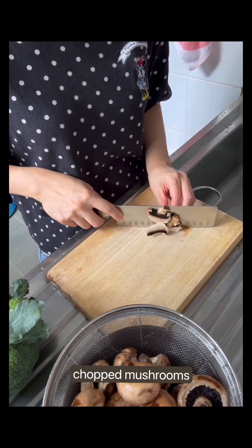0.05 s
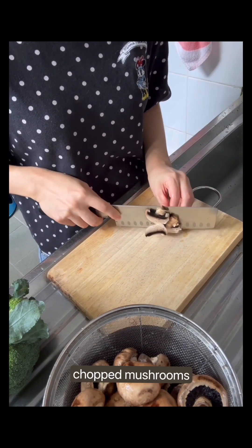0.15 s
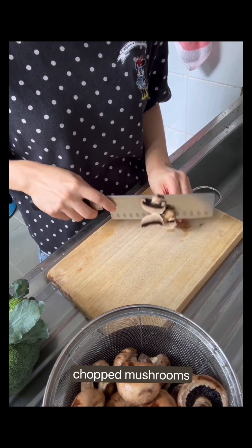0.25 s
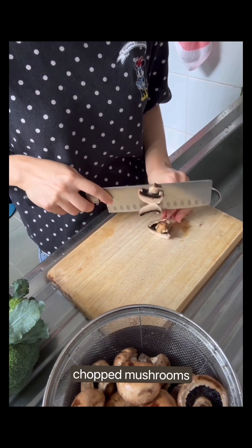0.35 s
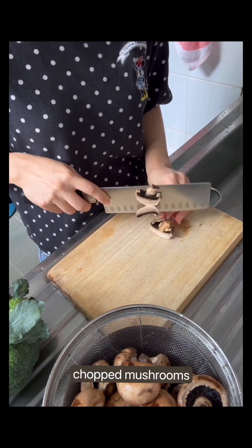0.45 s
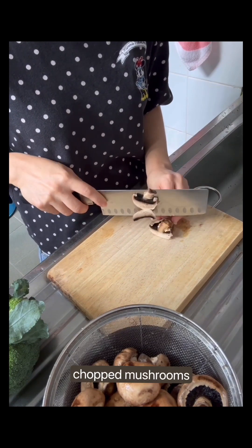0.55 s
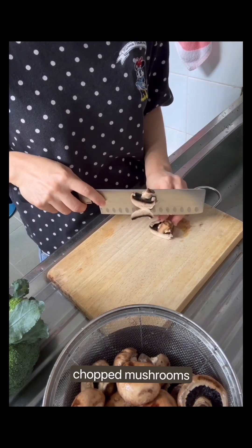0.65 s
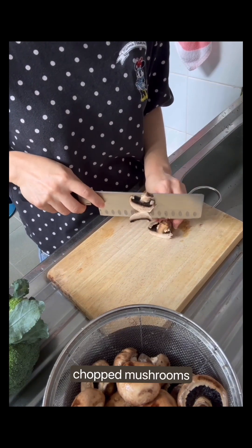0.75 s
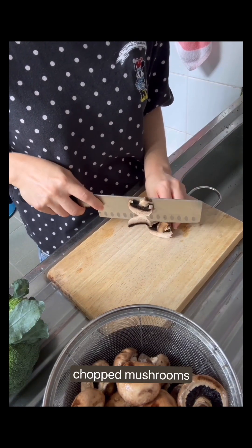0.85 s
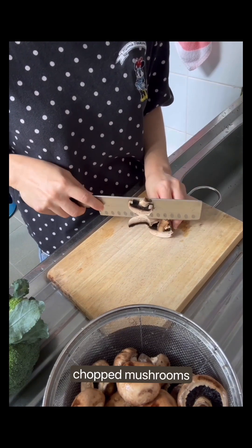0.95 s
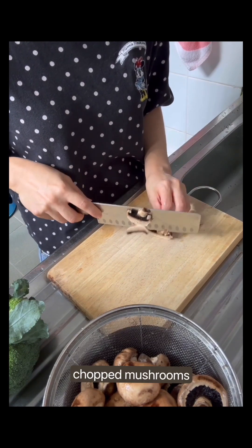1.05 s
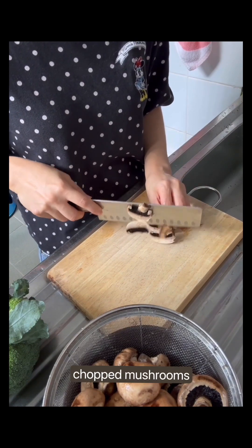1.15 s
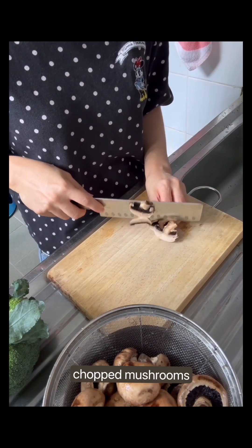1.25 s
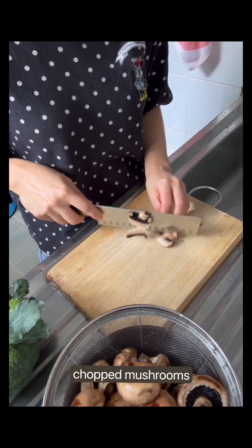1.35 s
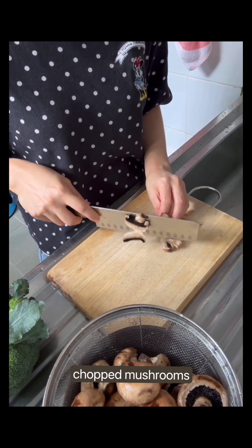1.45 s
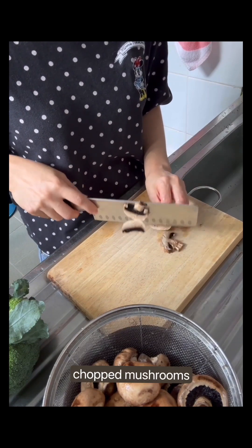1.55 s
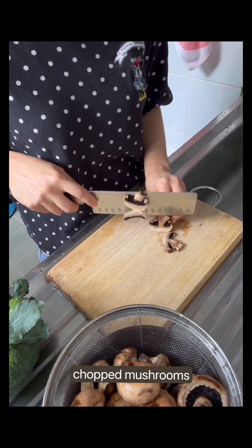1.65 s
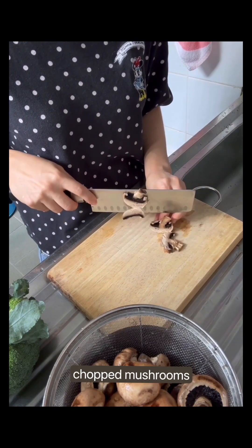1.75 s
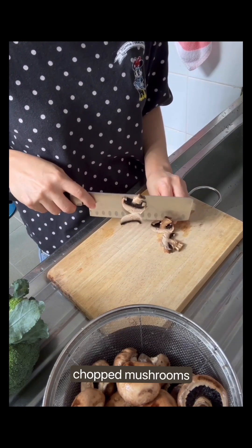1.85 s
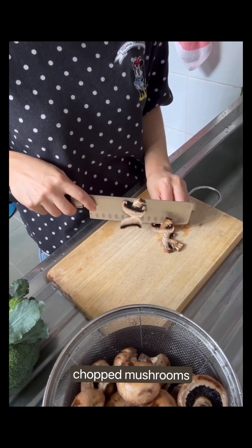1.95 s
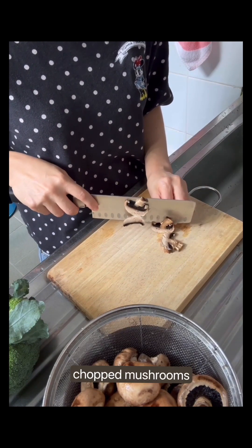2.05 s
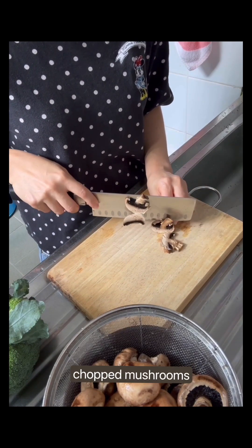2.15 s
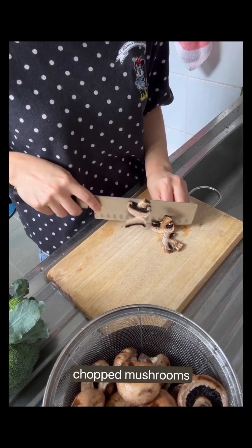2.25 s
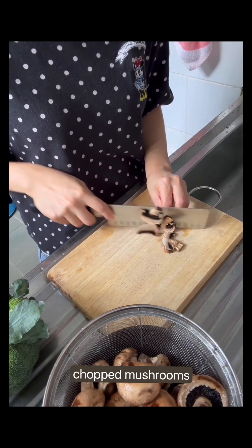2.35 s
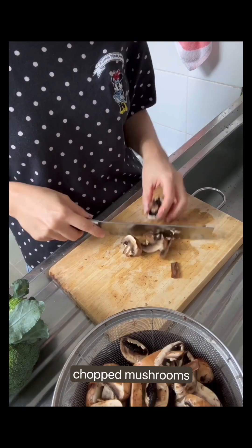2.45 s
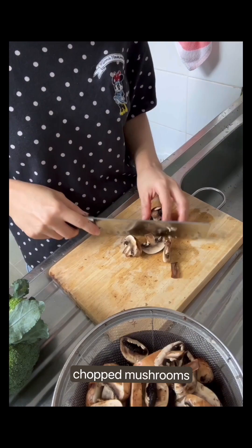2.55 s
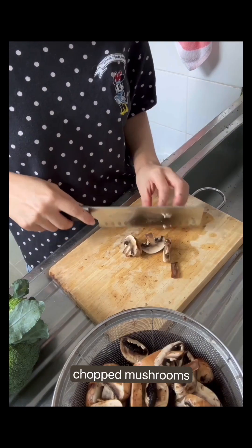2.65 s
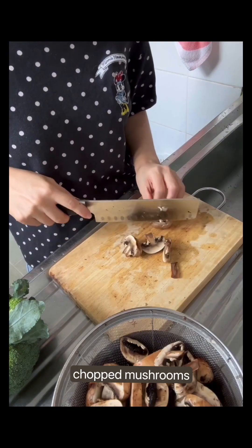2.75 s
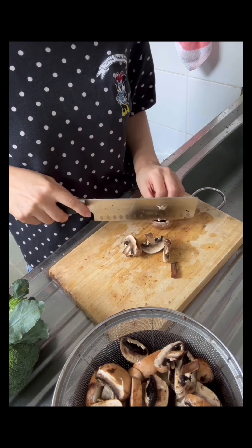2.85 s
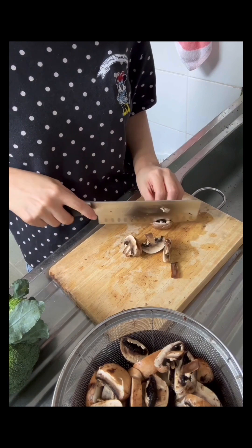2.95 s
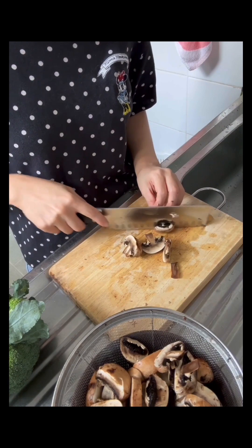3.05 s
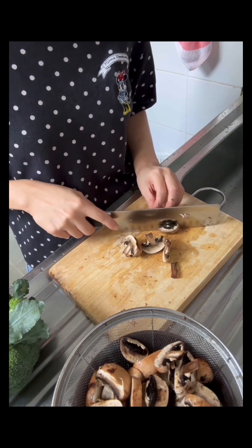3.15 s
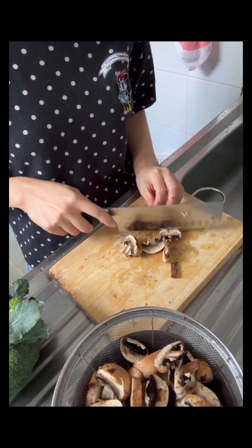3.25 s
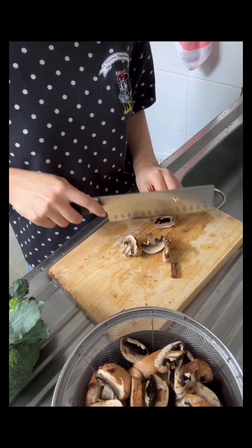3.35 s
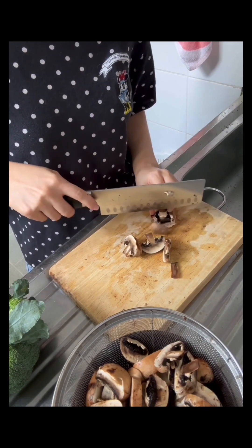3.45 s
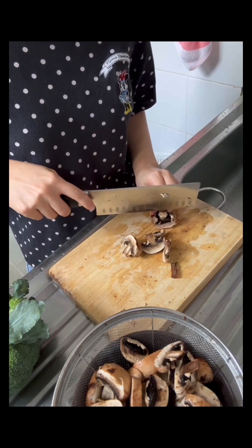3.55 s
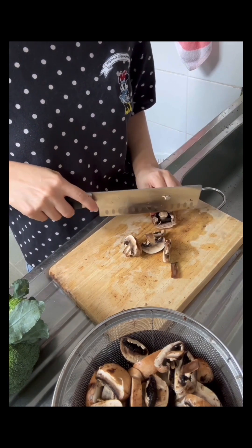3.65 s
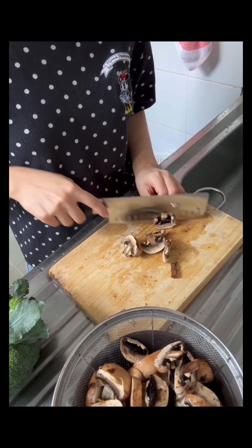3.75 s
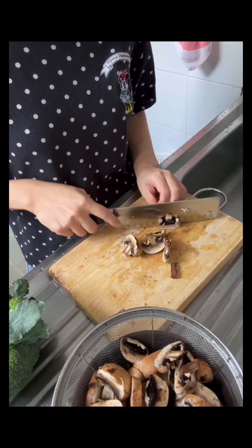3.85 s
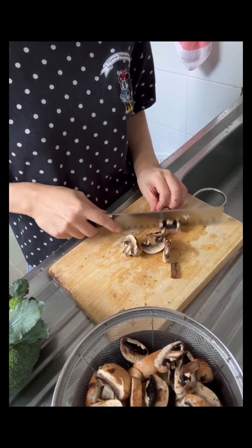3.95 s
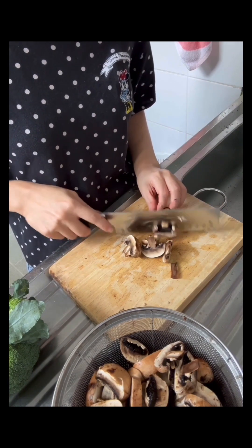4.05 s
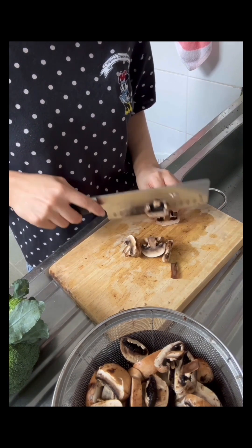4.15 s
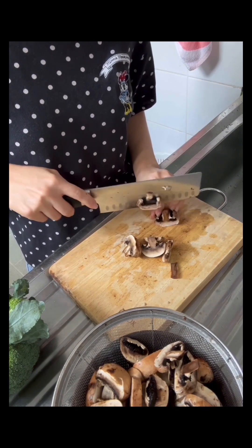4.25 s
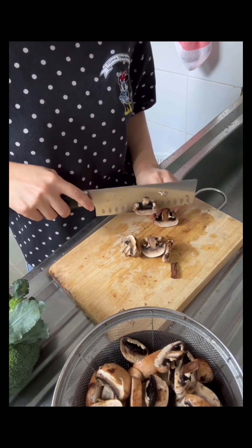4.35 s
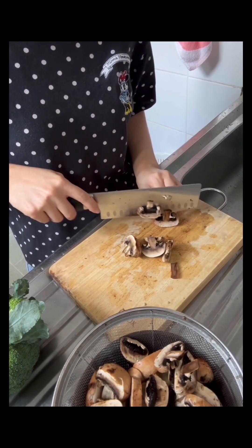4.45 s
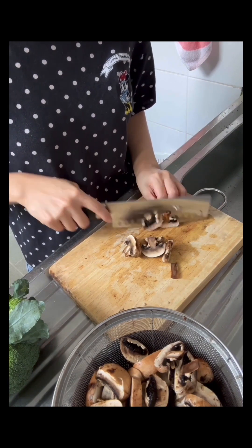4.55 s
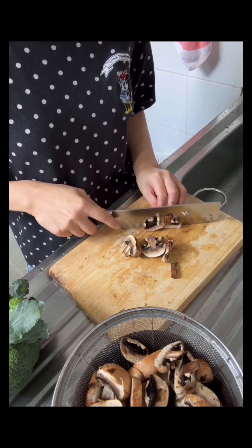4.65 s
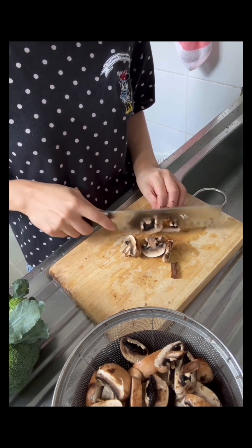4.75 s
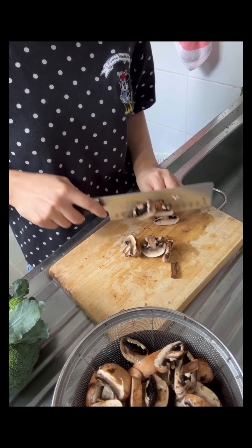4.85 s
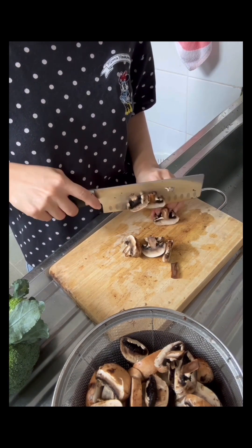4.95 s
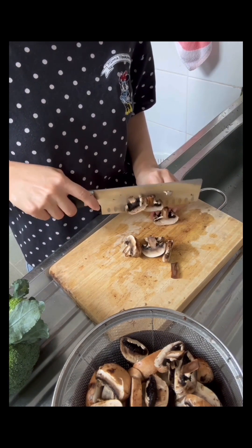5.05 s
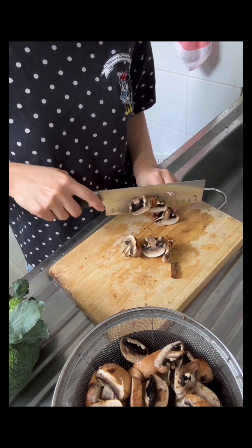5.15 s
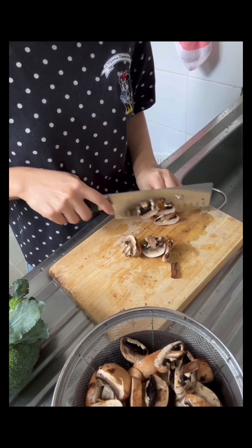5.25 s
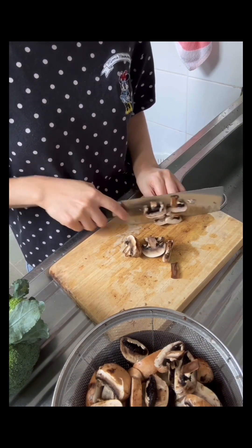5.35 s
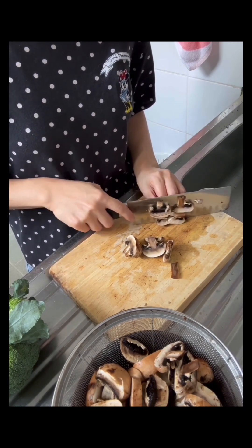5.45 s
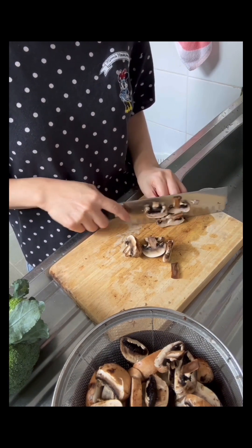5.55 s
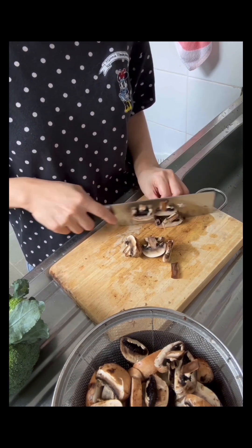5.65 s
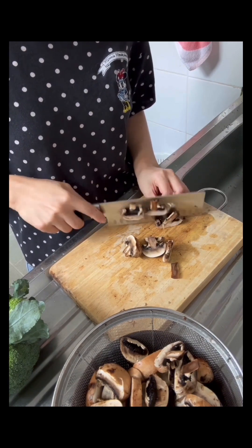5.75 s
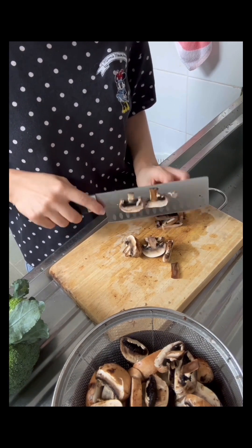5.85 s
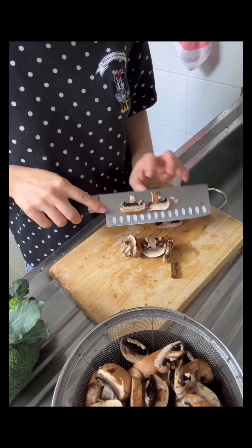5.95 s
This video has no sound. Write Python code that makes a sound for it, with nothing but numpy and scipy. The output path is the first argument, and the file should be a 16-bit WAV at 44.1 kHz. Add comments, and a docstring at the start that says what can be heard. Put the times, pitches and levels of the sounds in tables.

```python
"""A tiled kitchen: from the start, shaped noise gives a fan-like rumble, room air and hiss, and narrow
resonances give motor hum and whines. A blade hisses through soft mushrooms by lifting the treble.
Then a cleaver knocks a thick wooden board on a steel counter: clicks ring their modes, some with a rebound.
Small wet ticks are short noise bursts; far birds outside are blurred sine glides, and late on a wavering
sine makes a low drone that swells once. Feedback delays give knocks, ticks and birds their room."""
import sys
import numpy as np
from scipy import signal
from scipy.fft import rfft, irfft, next_fast_len
from scipy.io import wavfile

SR = 44100
rng = np.random.default_rng(int(sys.argv[2]) if len(sys.argv) > 2 else 0)


def generate_wav(signal):
    """Clip the signal to [-1, 1] and save it as 16-bit WAV at the path in sys.argv[1]."""
    frames = np.transpose(np.atleast_2d(signal))
    scaled = np.clip(frames, -1, 1) * 32767
    pcm = np.round(scaled).astype(np.int16)
    wavfile.write(sys.argv[1], SR, pcm)


N = 264159


def from_db(db):
    """Gain of a level in dB."""
    return 10 ** (np.asarray(db) / 20)


def rms_one(x):
    """Scaled to rms 1."""
    return x / np.sqrt(np.mean(x ** 2) + 1e-20)


def level_curves(rows):
    """One gain curve per level column, drawn straight in dB between the listed times."""
    s, *columns = np.transpose(rows)
    t = np.arange(N) / SR
    return [from_db(np.interp(t, s, db)) for db in columns]


def coloured(spectrum):
    """Noise of rms 1 with the given relative spectrum, silent outside it."""
    size = next_fast_len(N, real=True)
    hz = np.arange(1, size // 2 + 2) * SR / size
    point_hz, point_db = np.transpose(spectrum)
    db = np.interp(np.log(hz), np.log(point_hz), point_db, left=-200, right=-200)
    white = rfft(rng.standard_normal(size))
    return rms_one(irfft(white * from_db(db), size)[:N])


def ports(shared, apart):
    """Left and right from a shared part and one heard in opposite sense."""
    return np.array([shared + apart, shared - apart])


def ring(clicks, hz, t60):
    """A two-pole resonance: a unit click sets a sine of height 1 ringing, 60 dB down after t60."""
    r = from_db(-60 / (t60 * SR))
    w = 2 * np.pi * hz / SR
    return signal.lfilter([0, np.sin(w)], [1, -2 * r * np.cos(w), r * r], clicks + 1e-18)


def burst(times, dbs, t60):
    """Envelope that jumps at each time and dies away exponentially."""
    jumps = np.full(N, 1e-18)
    jumps[np.round(np.asarray(times) * SR).astype(int)] = from_db(dbs)
    return signal.lfilter([1], [1, -from_db(-60 / (t60 * SR))], jumps)


# fan-like rumble, rms of its two bands: (t/s, deep level/dB, upper level/dB)
RUMBLE_LEVEL = [(0, -42, -34), (1, -39.5, -34.5), (1.7, -34.5, -33.5), (2.3, -36.5, -35.5),
                (2.6, -36, -34.5), (4.1, -35.5, -32), (4.9, -32, -34), (5.1, -39.5, -34.5), (6, -36.5, -34)]
# relative spectrum of each band: (f/Hz, level/dB)
DEEP_TONE = [(15, -24), (24, -23.5), (29, -1), (34, -10), (40, -8), (52, 3), (60, 7.5), (68, -1),
             (80, -7.5)]
UPPER_TONE = [(66, -8), (74, -3), (88, -0.5), (100, 2.5), (110, -13.5), (125, -21.5), (140, -20.5)]


def rumble():
    """Two bands of low noise, each riding its own level curve."""
    deep, upper = level_curves(RUMBLE_LEVEL)
    return deep * coloured(DEEP_TONE) + upper * coloured(UPPER_TONE)


# room air, relative spectra of the shared and the opposite part: (f/Hz, level per Hz/dB)
AIR_SHARED = [(71, -34), (120, -0.5), (151, -0.5), (169, -13.5), (203, -0.5), (326, -8.5), (390, -6),
              (423, -9), (738, -12.5), (1040, -20), (1130, -23), (1330, -21), (1400, -23.5), (1970, -18.5),
              (6000, -45), (7800, -109.5), (13200, -120)]
AIR_APART = [(59, -40), (100, -30.5), (141, -30), (224, -29), (294, -1), (361, -6.5), (500, -1),
             (555, -3.5), (976, 1), (1280, -1.5), (1400, 3), (2340, -11), (2590, 1.5), (3780, -14),
             (6000, -30.5), (7800, -51), (13200, -120)]
AIR_SHARED_DB, AIR_APART_DB = -37, -49.5


def room_air():
    """Steady broadband noise, mostly common to both sides."""
    shared = from_db(AIR_SHARED_DB) * coloured(AIR_SHARED)
    return ports(shared, from_db(AIR_APART_DB) * coloured(AIR_APART))


# treble hiss before the slides lift it: (t/s, level/dB)
HISS_LEVEL = [(0, -64.5), (2.45, -66), (2.5, -62), (6, -63)]
# relative spectra of its shared and opposite part: (f/Hz, level per Hz/dB)
HISS_SHARED = [(2940, 12.5), (5000, 6.5), (6770, -1), (7650, -78), (7950, -39), (8060, -48.5), (8950, -4),
               (10500, -1), (13000, -8.5), (14600, -13), (15500, -53)]
HISS_APART = [(2940, -13), (5000, 0), (8060, -2.5), (9120, -2.5), (10500, -11), (10700, -15),
              (10900, -40.5), (12500, -43.5), (12700, -16), (13400, -16.5), (15500, -9)]
# blade sliding through food: (middle t/s, length/s, rise/dB)
SLIDES = [(.45, 0.086, 4.5), (.9, 0.074, 2), (1.298, 0.17, 4.5), (2.145, 0.06, 7), (2.348, 0.17, 12),
          (3.05, 0.18, 5.5), (3.47, .16, 3), (3.78, 0.1, 10), (3.97, .08, 5.5), (4.559, 0.13, 8),
          (4.72, .07, 2), (5.322, 0.18, 8.5), (5.62, 0.23, 9)]
HISS_APART_DB = -4    # relative to the shared part
FLICKER_DB, FLICKER_HZ = 1.5, 18    # the upper hiss flickers: rms depth, fastest rate


def hiss():
    """Treble noise whose upper part flickers and is lifted by every slide of the blade."""
    t = np.arange(N) / SR
    rise_db = FLICKER_DB * coloured([(1.5, 0), (FLICKER_HZ, -4)])
    for s, length, db in SLIDES:
        rise_db += db * np.exp(-(2 * (t - s) / length) ** 4)
    (gain,) = level_curves(HISS_LEVEL)
    air = gain * ports(coloured(HISS_SHARED), from_db(HISS_APART_DB) * coloured(HISS_APART))
    low = signal.sosfilt(signal.butter(2, 6500, "low", fs=SR, output="sos"), air)
    high = signal.sosfilt(signal.butter(2, 6500, "high", fs=SR, output="sos"), air)
    return low - high * from_db(rise_db)    # the two filters are opposed where they cross


# motor hum and whines, each side 3 dB above the listed level:
# (f/Hz, width of one resonance/Hz, level/dB, left-right likeness, steady share of power 0-1)
WHINES = [(28.3, 5, -46.5, 1, .85), (143, 9.2, -52.5, 1, 0.45), (1109, 11, -59, 0.73, 0.73),
          (1452, 8.8, -56.5, 0.54, 0.84), (1985, 88, -54, 0.67, 0.01), (2850, 35, -64, 0.091, 0.14)]
FLARE_DB, FLARE_HZ = 3, 12    # the noisy part flares: rms depth, fastest rate


def whines():
    """A steady tone inside noise that went twice through a narrow resonance."""
    out = np.zeros((2, N))
    t = np.arange(N) / SR
    for hz, width_hz, db, alike, steady in WHINES:
        t60 = np.log(1000) / (np.pi * width_hz)
        white = rng.standard_normal((2, N + SR))
        noise = rms_one(ring(ring(white, hz, t60), hz, t60)[:, SR:])    # drops the build-up
        flare_db = FLARE_DB * coloured([(1.5, 0), (FLARE_HZ, -4)])
        noise = rms_one(noise * from_db(flare_db))
        tone = np.sin(2 * np.pi * (hz * t + rng.random((2, 1))))
        shared, apart = np.sqrt(2 * steady) * tone + np.sqrt(1 - steady) * noise
        out += from_db(db) * ports(np.sqrt(1 + alike) * shared, np.sqrt(1 - alike) * apart)
    return out


# blade on board: (t/s, level/dB, board tilt/dB per octave from 750 Hz,
# counter tilt/dB per octave from 750 Hz, crack level/dB, long ring boost/dB)
KNOCKS = [(2.3154, -4, 4.5, -0.5, -26.5, -4), (2.386, -18.5, -8, 5, -46, -4),
          (2.394, -21.5, -3, -4, -46, -4), (3.0362, -3, -5.5, -3.5, -31.5, 3),
          (3.7742, -4.5, -0.5, -0.5, -39, 3), (4.5552, -4.5, 3, 4, -27.5, 1), (4.5655, -18, 0, 3, -48, 0),
          (4.577, -24, -1, 7, -53, 1.5), (4.615, -19.5, -3, 7.5, -48, -4), (4.622, -28, -9, 2.5, -54, 0),
          (5.3445, -2.5, 0.7, -0.3, -33, 3), (5.481, -25, -1, 6, -50, -3)]
# board modes: (f/Hz, level/dB, t60/s, sense +-1, left-right/dB)
# the strong pair starts opposed, so the knock swells, then cancels
BOARD = [(558, -23, 0.04, -1, -2), (636.5, -11, 0.072, 1, -1), (711, 6.5, 0.022, -1, -3),
         (738, -19.5, 0.1, -1, -2), (796, 7, 0.024, 1, -3.5), (890, -14.5, 0.055, -1, -1),
         (940, -20, 0.068, 1, -0.5), (1067, -17.5, 0.058, -1, 8), (1116, -18, 0.15, 1, -9.5),
         (1200, -26, 0.071, -1, -4), (1444, -22, 0.045, 1, 0.5), (1530, -30.5, 0.023, -1, 0),
         (1630, -37, .05, 1, 2), (2104, -21, 0.03, -1, 2), (2320, -41, 0.11, 1, 3),
         (2445, -39, 0.049, -1, 1), (2794, -33, 0.049, 1, 5), (2900, -47, 0.031, -1, 3),
         (3190, -45, .05, 1, 2), (4580, -35.5, 0.011, 1, 3)]
# modes of the counter under the board, same columns
COUNTER = [(113, -20, 0.12, 1, 0), (206.6, -22.5, 0.23, -1, 0), (290.5, -16, 0.042, 1, -1),
           (398.6, -20, 0.084, -1, -1), (470, -24.5, 0.21, 1, -1)]
# crack of the edge, added to each blow's crack level: (f/Hz, level/dB, t60/s)
CRACK = [(517, -6.5, 0.097), (1026, -3, 0.15), (1580, -4.5, 0.097), (2050, -5.5, 0.16), (2730, -5, 0.045),
         (3680, -13, .04), (4260, -18, 0.018), (6370, -48, 0.014), (11000, -22, 0.016)]
COUNTER_LAG_S = 0.002    # the counter answers a little after the board
LONG_RING_LOW_HZ, LONG_RING_HIGH_HZ = 1085, 1250    # modes that take the long ring boost
SOFT_LOSS = 0.22    # dB lost by the strong pair for each dB that a blow is softer


def knocks():
    """Every blow sets board and counter modes ringing and adds the crack of the edge."""
    s, strength_db, board_tilt_db, counter_tilt_db, crack_db, long_db = np.transpose(KNOCKS)
    at = np.round(s * SR).astype(int)
    softness_db = strength_db - strength_db.max()
    out = np.zeros((2, N))
    bodies = ((BOARD, board_tilt_db, 0), (COUNTER, counter_tilt_db, round(COUNTER_LAG_S * SR)))
    for modes, tilt_db, lag in bodies:
        for hz, db, t60, sense, pan_db in modes:
            reach = abs(np.log2(hz / 750))    # octaves from the main ring
            # far modes depend on the spot struck
            change_db = rng.normal(0, 2.26, len(at)) * min(4 * reach, 1)
            if LONG_RING_LOW_HZ < hz < LONG_RING_HIGH_HZ:
                change_db += long_db
            if db > 0:    # the strong pair
                change_db += SOFT_LOSS * softness_db
            clicks = np.zeros(N)
            clicks[at + lag] = sense * from_db(strength_db + db + reach * tilt_db + change_db)
            out += ring(clicks, hz, t60) * from_db([[pan_db / 2], [-pan_db / 2]])
    return out + cracks(s, crack_db)


def cracks(s, crack_db):
    """Bands of noise, each dying at its own rate after the blow."""
    out = np.zeros((2, N))
    spread = 0.18    # half width of a band, as a share of its centre
    white = rng.standard_normal((2, 2, N))    # neighbouring bands get unrelated noise
    for k, (hz, db, t60) in enumerate(CRACK):
        edges_hz = [hz / (1 + spread), hz * (1 + spread)]
        band = signal.butter(2, edges_hz, "band", fs=SR, output="sos")
        shared, apart = rms_one(signal.sosfilt(band, white[k % 2]))
        sides = ports(shared, 0.94 * apart) * from_db([[1], [-1]])    # louder on the left
        out += burst(s, crack_db + db, t60) * sides
    return out


KITCHEN_T60_S, WALL_CUT_HZ = 0.15, 5200    # decay before the dulling, lowpass of every round


def kitchen(x):
    """Room echo: eight feedback delays for each of two parts, duller on every round."""
    out = np.zeros((2, N))
    dull = np.exp(-2 * np.pi * WALL_CUT_HZ / SR)
    lags = (rng.uniform(0.011, 0.023, size=16) * SR).astype(int)
    for k, lag in enumerate(lags):
        loop, state = x.copy(), [0.]
        gain = from_db(-60 * lag / SR / KITCHEN_T60_S)
        for i in range(lag, N, lag):    # one block per round
            back, state = signal.lfilter([gain * (1 - dull)], [1, -dull], loop[i - lag:i], zi=state)
            loop[i:i + lag] += back[:N - i]
        out[k % 2] += (loop - x) * (-1) ** (k // 2)
    return out


# small wet ticks: (t/s, envelope level before its edge is softened/dB, t60/s)
TICKS = [(2.481, -47, .012), (3.973, -39, 0.022), (5.246, -54, 0.0081)]
TICK_LOW_HZ, TICK_HIGH_HZ, TICK_RISE_S = 3600, 5000, 0.0015


def ticks():
    """Short bright noise bursts with a soft edge."""
    band = signal.butter(1, [TICK_LOW_HZ, TICK_HIGH_HZ], "band", fs=SR, output="sos")
    soft = np.exp(-1 / (TICK_RISE_S * SR))
    jumps = sum(burst([s], db, t60) for s, db, t60 in TICKS)
    envelope = signal.lfilter([1 - soft], [1, -soft], jumps)
    return envelope * rms_one(signal.sosfilt(band, rng.standard_normal((2, N))))


# four-note phrase of a far bird:
# (t after the start/s, length/s, first f/Hz, last f/Hz, level/dB, left-right/dB)
PHRASE = [(0.0, .08, 5200, 5010, -58, 0.0), (0.082, .095, 3280, 3300, -56, -5),
          (0.213, .12, 3930, 3930, -56.5, -2.5), (.465, 0.15, 4790, 4850, -58.5, 0.6)]
# the phrase is sung twice: (start t/s, level added to its notes/dB)
PHRASES = [(2.605, -4), (3.712, -1.2)]
# lone notes: (start t/s, length/s, first f/Hz, last f/Hz, level/dB, left-right/dB)
LONE_NOTES = [(4.22, .05, 3850, 3800, -63, -2), (4.313, 0.041, 3020, 3010, -54, 0),
              (5.742, .085, 5700, 4780, -61, 5), (5.81, .036, 4800, 4700, -57, -6)]
BIRD_BLUR_HZ, BIRD_CLEAR = 105, 0.25    # fastest blur, unblurred part beside a blur of rms 1


def birds():
    """Gliding whistles, blurred by the many paths they arrive on."""
    out = np.zeros((2, N))
    notes = [(start + s, length, first_hz, last_hz, db + phrase_db, pan_db)
             for start, phrase_db in PHRASES
             for s, length, first_hz, last_hz, db, pan_db in PHRASE]
    slow = signal.butter(2, BIRD_BLUR_HZ, fs=SR, output="sos")
    for start, length, first_hz, last_hz, db, pan_db in notes + LONE_NOTES:
        at, size = round(start * SR), round(length * SR)
        phase = 2 * np.pi * np.cumsum(np.linspace(first_hz, last_hz, size)) / SR
        whistle = np.sin(phase) * signal.windows.tukey(size, 0.6)
        blur = rms_one(signal.sosfilt(slow, rng.standard_normal((2, N // 10))))[:, -size:]
        shared, apart = whistle * (BIRD_CLEAR + blur)
        pan = from_db([[db + pan_db / 2], [db - pan_db / 2]])
        out[:, at:at + size] += ports(shared, 0.5 * apart) * pan
    return out


DRONE_HZ, DRONE_DB, DRONE_WAVER_HZ = 86.3, -29.5, 4.0    # pitch, rms at full swell, fastest waver
DRONE_START_S, DRONE_RISE_S, DRONE_HOLD_S, DRONE_FALL_S = 4.05, 0.31, 0.19, 0.062


def drone():
    """A nearly pure low tone, wavering in level, that swells once, holds and drops."""
    t = np.arange(N) / SR
    corners_s = DRONE_START_S + np.cumsum([0, DRONE_RISE_S, DRONE_HOLD_S, DRONE_FALL_S])
    swell = np.interp(t, corners_s, [0, 1, 1, 0])
    waver_db = 1.3 * coloured([(0.2, 0), (DRONE_WAVER_HZ, 0)])
    tone = np.sqrt(2) * np.sin(2 * np.pi * (DRONE_HZ * t + rng.random()))
    return from_db(DRONE_DB + waver_db) * swell * tone


def scene():
    """Knocks, ticks and birds with their room echo, over the steady air and the drone."""
    steady = rumble() + room_air() + hiss() + whines()
    near, far = knocks() + ticks(), birds()
    # the left channel feeds the room
    shared, apart = kitchen(from_db(-16.0) * near[0] + from_db(-3.5) * far[0])
    return steady + near + far + ports(shared, 0.3 * apart) + drone()


CUTOFF_HZ = 15640


def record(dry):
    """Peaks are rounded, both ends fade over 5 ms, the top is cut steeply."""
    rounded = 1.314 * np.tanh(dry / 1.284)
    fade = signal.windows.tukey(N, 0.01 * SR / N)
    steep = signal.ellip(10, 0.5, 70, CUTOFF_HZ, fs=SR, output="sos")
    return signal.sosfilt(steep, fade * rounded)


dry = scene()
out = record(dry)
generate_wav(out)
```